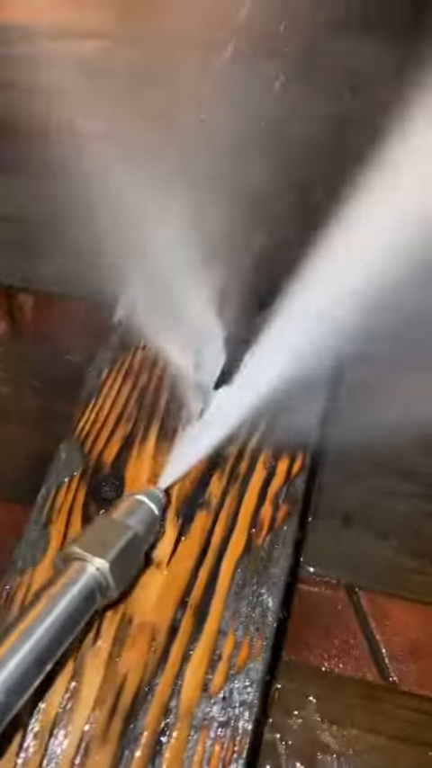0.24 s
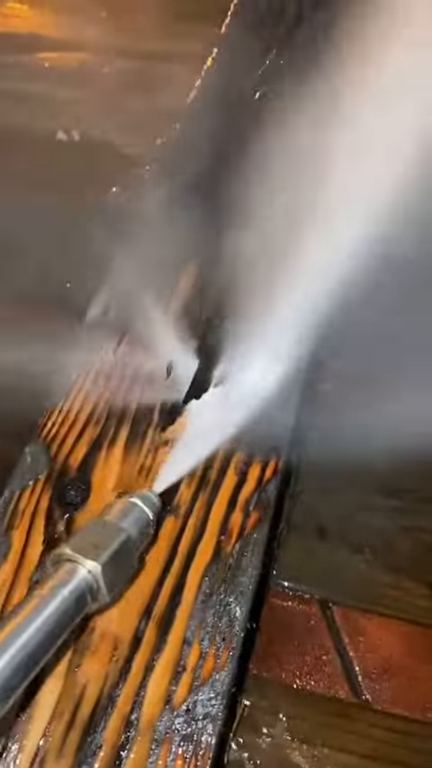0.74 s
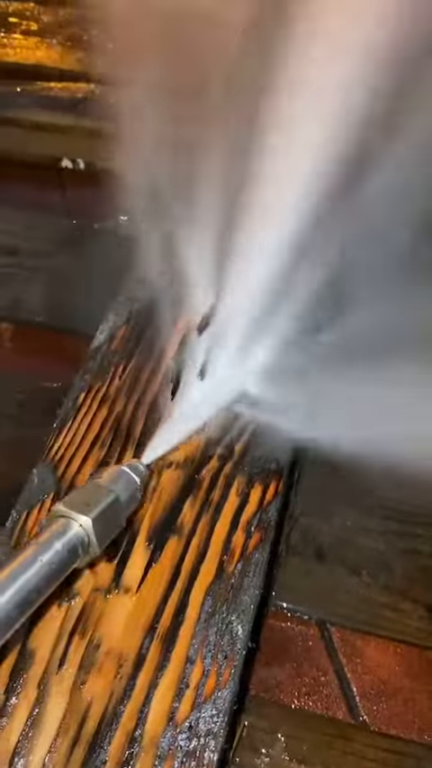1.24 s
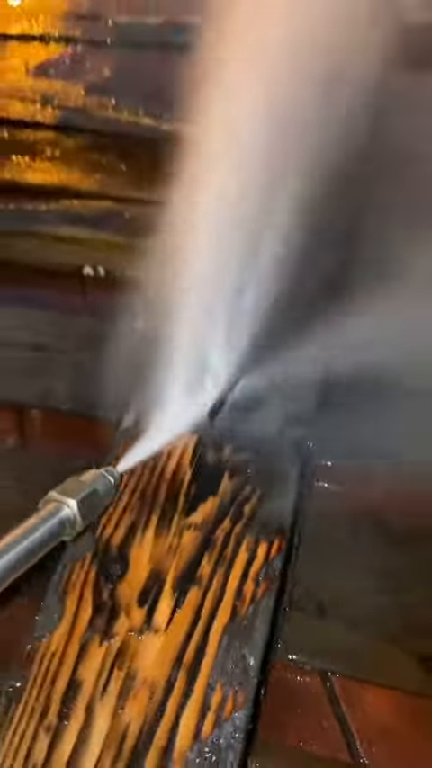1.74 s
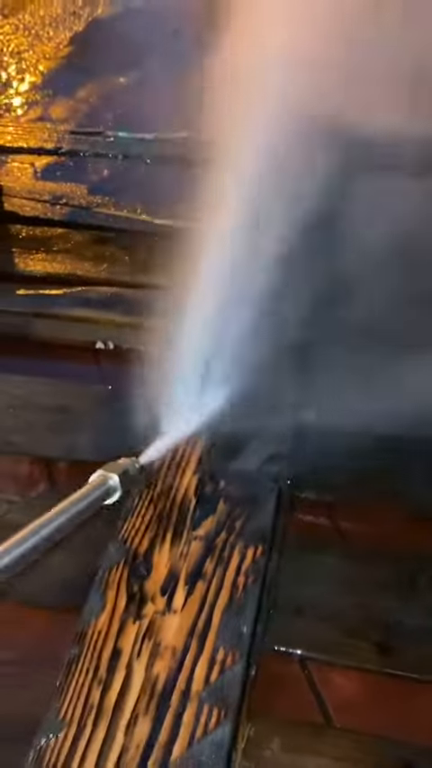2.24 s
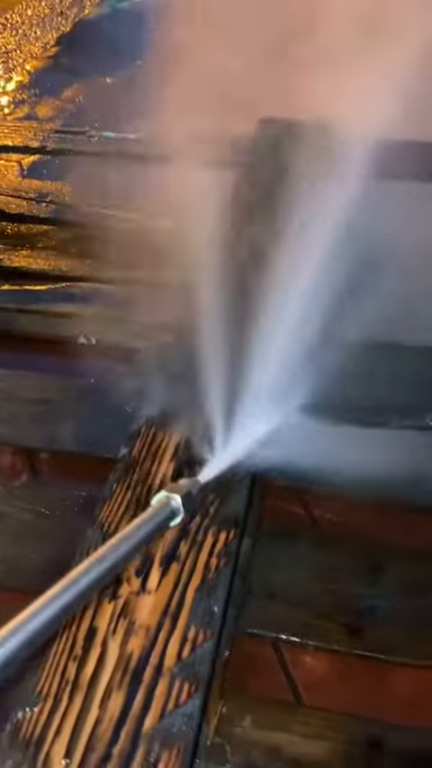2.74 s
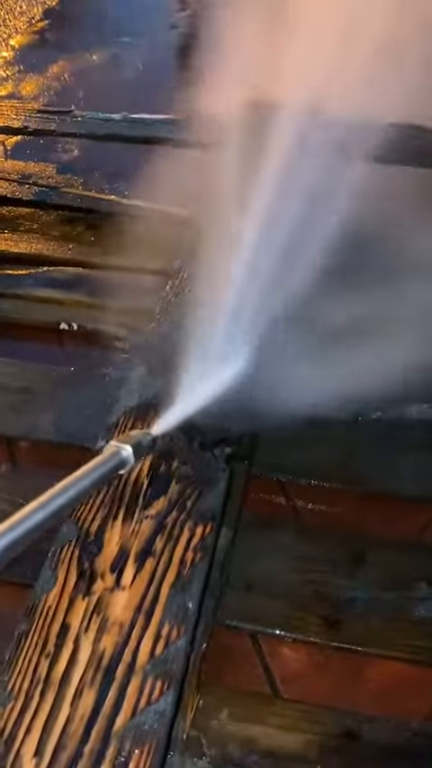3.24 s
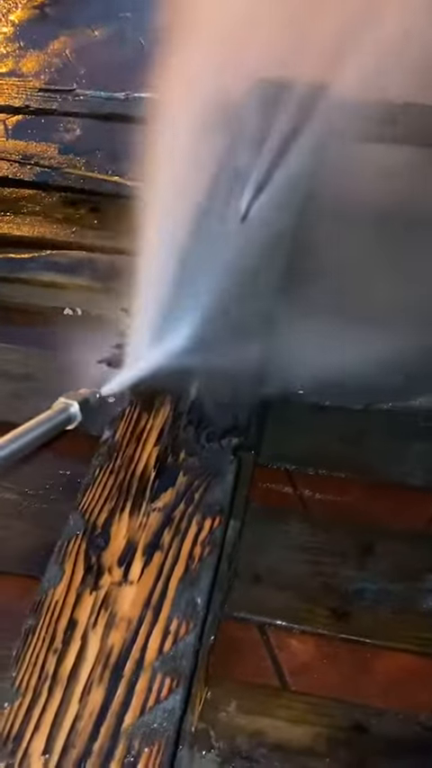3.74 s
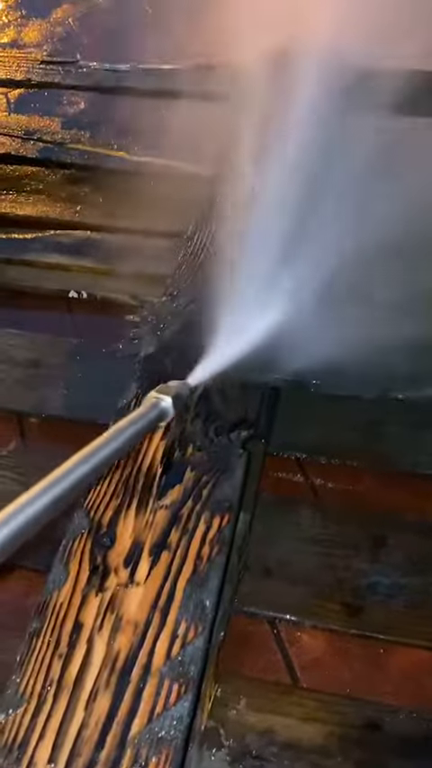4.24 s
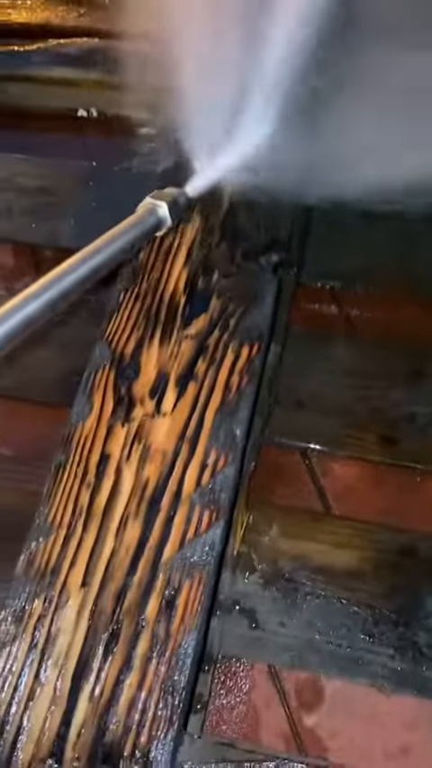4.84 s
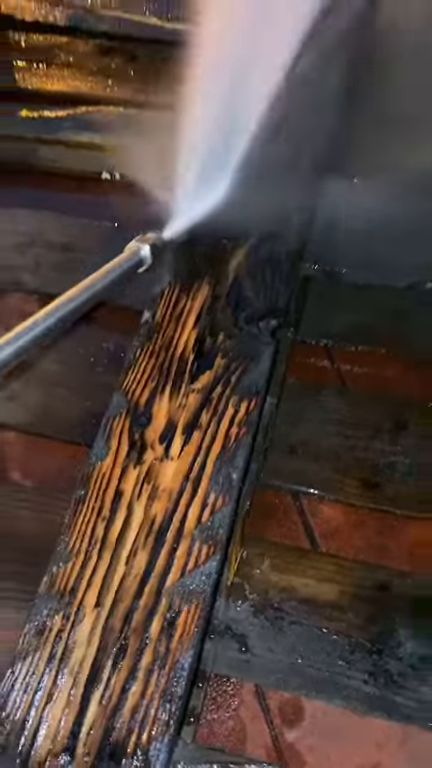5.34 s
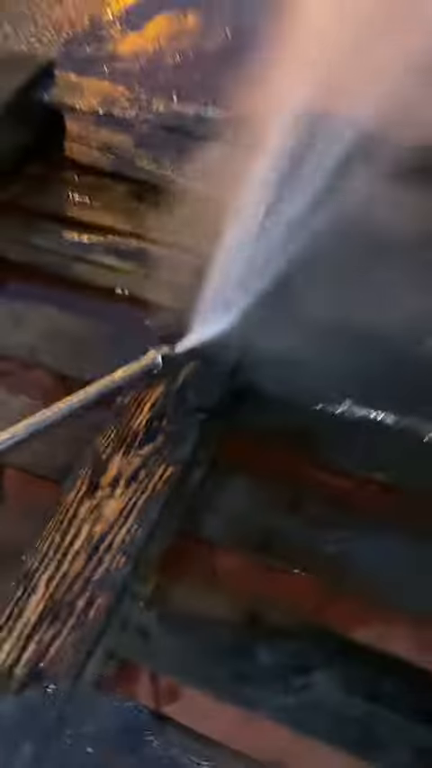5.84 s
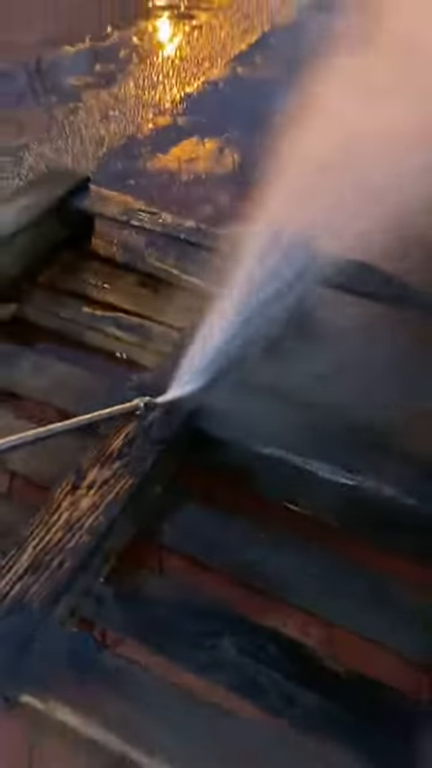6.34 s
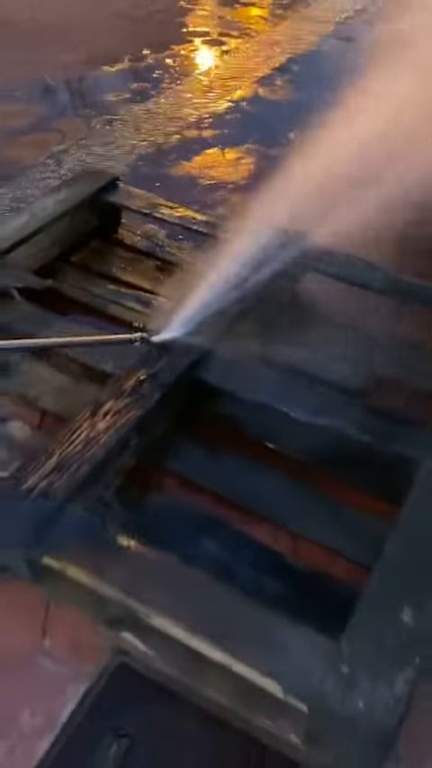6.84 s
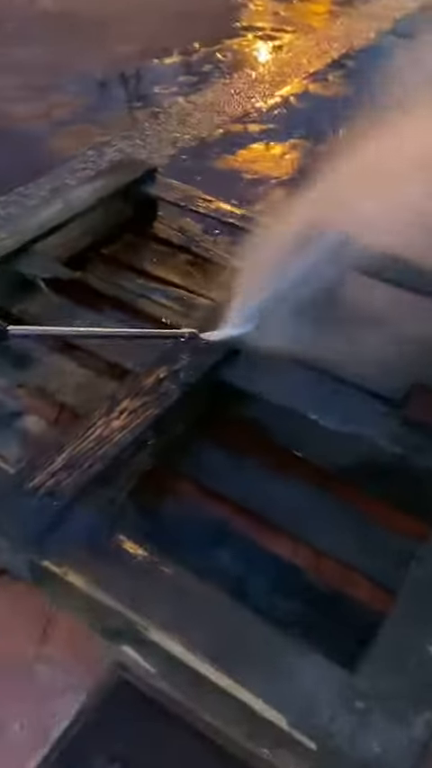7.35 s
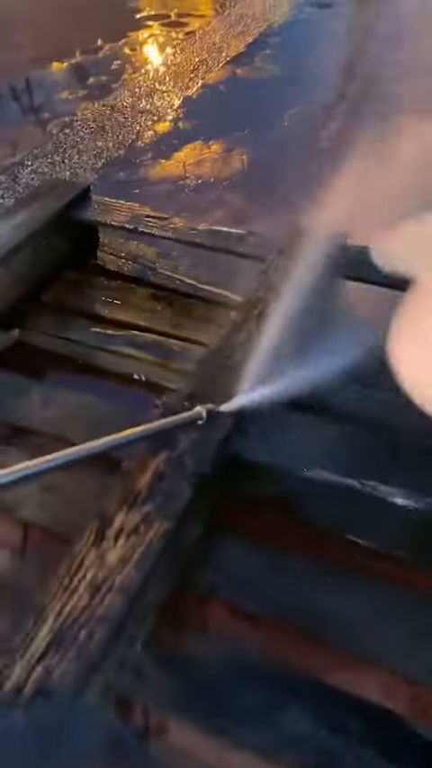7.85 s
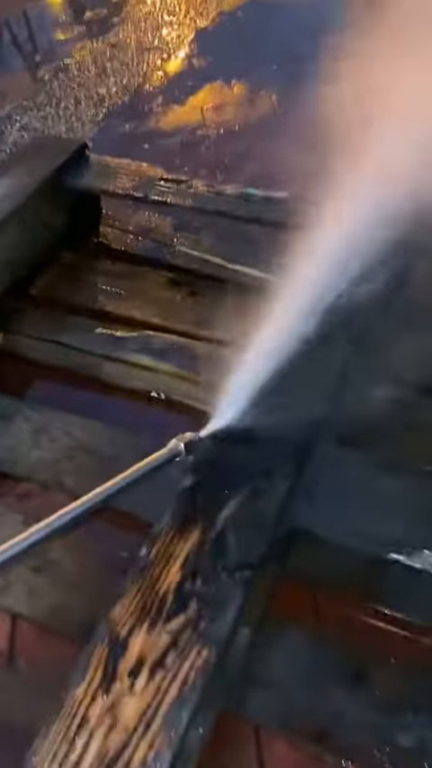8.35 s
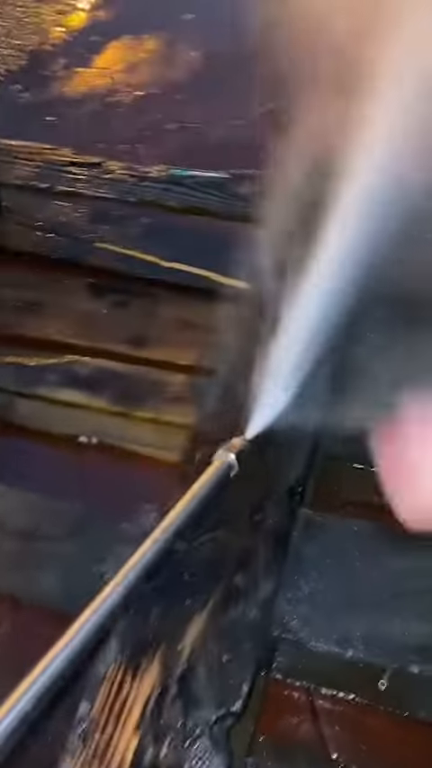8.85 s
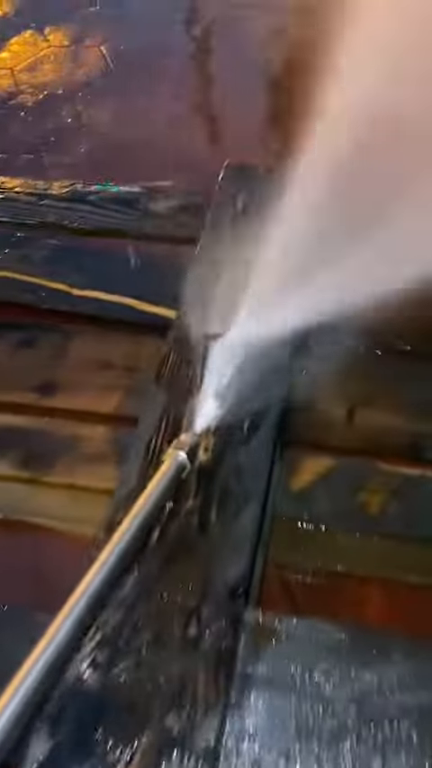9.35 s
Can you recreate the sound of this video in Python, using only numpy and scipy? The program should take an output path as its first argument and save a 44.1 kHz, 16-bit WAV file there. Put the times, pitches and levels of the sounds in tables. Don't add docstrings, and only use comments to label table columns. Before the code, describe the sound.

Close high-pressure water blasts timber with harsh steady hiss and hollow ringing gouges; a distant engine hums, and late puffs and droplets buffet the phone.

```python
import sys
import numpy as np
from scipy import signal
from scipy.fft import rfft, irfft, next_fast_len
from scipy.io import wavfile
from scipy.ndimage import uniform_filter1d

SR = 44100
rng = np.random.default_rng(int(sys.argv[2]) if len(sys.argv) > 2 else 0)


def to_linear_factor(level_db):
    exponent = np.asarray(level_db, float) / 20
    return 10 ** exponent


def wrap_up_sound(samples):
    columns = np.atleast_2d(samples).T
    tamed = np.clip(columns, -1, 1)
    steps = np.round(tamed * 32767).astype(np.int16)
    wavfile.write(sys.argv[1], SR, steps)


N = 422901
SIZE, HOP = 1024, 256
FRAME_RATE = SR / HOP
HZ = np.maximum(np.arange(SIZE // 2 + 1) * SR / SIZE, 1)[:, None]


def frames(x):
    return signal.stft(x, SR, nperseg=SIZE, noverlap=SIZE - HOP)[1:]


def unframe(z):
    return signal.istft(z, SR, nperseg=SIZE, noverlap=SIZE - HOP)[1][..., :N]


def over_time(table, t):
    s, *columns = np.transpose(table)
    return [np.interp(t, s, c) for c in columns]


def over_hz(table):
    hz, value = np.transpose(table)
    return np.interp(np.log(HZ), np.log(hz), value)


def walk(shape, hold):
    w = rng.standard_normal(shape)
    w = uniform_filter1d(uniform_filter1d(w, int(hold)), int(hold))
    return w / w.std()


def colour(table, lo_hz, hi_hz, lift_db=0):
    gain = to_linear_factor(over_hz(table) + lift_db)
    inside = (HZ > lo_hz) & (HZ < hi_hz)
    return gain / np.sqrt(np.sum(gain[inside] ** 2) / len(HZ))


def patches(count, swell_db, own_db):
    own = walk((28, count), hold=4.4)
    shared = uniform_filter1d(walk((28, count), hold=4.7), size=9, axis=0)
    field = own_db * own + swell_db * shared / shared.std()
    band = np.clip(np.log2(HZ[:, 0] / 40) * 3, 0, 26)
    low, part = band.astype(int), (band % 1)[:, None]
    return to_linear_factor(field[low] * (1 - part) + field[low + 1] * part)


# pitch in Hz, share of the power common to both.
ALIKE = [(60, 0.44), (300, 0.84), (700, 0.7), (1200, 0.5), (2300, 0.74), (5000, 0.58), (8500, 0.37),
         (9800, 0.08), (16000, 0.061)]


def ports(gain, lead, scatter, sputter_db, sputter_hz, edge=1):
    noise = rng.standard_normal((3, N)) * to_linear_factor(sputter_db * walk(N, SR / sputter_hz))
    near, left, right = frames(noise / noise.std())[1]
    turn = edge * np.exp(1j * np.pi * HZ * lead / SR)
    spread = np.where(HZ < 1800, np.minimum(scatter, .8), scatter)
    share = over_hz(ALIKE) ** np.where(HZ < 9400, spread, 1)
    near, far = near * np.sqrt(share), np.sqrt(1 - share)
    return unframe(gain * np.array([near * turn + far * left, near / turn + far * right]))


def bursts(t, start, length, db):
    start, length, db = (np.array(c)[:, None] for c in (start, length, db))
    attack_share, release_s, fade_db = 0.29, 0.054, 13.5
    early = np.maximum(1 - (t - start) / (attack_share * length), 0)
    late = np.maximum((t - start - length) / release_s, 0)
    return np.sum(to_linear_factor(db - fade_db * (early + late)) ** 2, axis=0)


# resonance in Hz, width in Hz, lift in dB.
PLANKS = [(592, 106, 6), (768, 113, 6), (1069, 205, 6.5), (1290, 33, 7.5), (1770, 90, -0.5), (2022, 154, 5),
          (2410, 300, 0.5), (3010, 76, 4), (3250, 112, 2), (4500, 350, 1.5), (5050, 980, -2.5)]


def planks():
    return sum(db / (1 + (2 * (HZ - hz) / width) ** 2) for hz, width, db in PLANKS)


# time in seconds, nozzle level at the phone in dB,
# glancing spray over it in dB, pressure into the wood over it in dB.
JET = [(0, -30, -3.5, -7.5), (.55, -30, -3, -10), (.75, -30, -2, -2.5), (1.25, -29, -6.5, -4),
       (1.5, -29.5, -3.5, -10), (1.95, -33, -1, -5), (2.35, -34, -2.5, -0.5), (2.8, -34.5, -2.5, 1.5),
       (3.7, -34, -11, -2), (4.3, -33, -4, -1.5), (4.8, -29, -2, -9.5), (5.4, -33, -3.5, -5),
       (5.95, -37.5, -4, -3.5), (7.2, -36.5, -1, -5), (7.75, -36, 0.5, 10), (7.87, -34.5, 1, 5),
       (7.96, -32.5, -0.5, -8.5), (8.95, -31, -8, -3), (9.59, -32, -5, -4)]
# start in seconds, length in seconds, roar in dB, bite over the roar in dB.
GOUGES = [(2.59, 0.17, -35.5, -0.5), (2.64, 0.54, -35, -22), (3.683, 0.098, -52.5, 19),
          (4.133, 0.48, -35, -19), (6.015, 0.097, -40, 0), (7.284, 0.57, -29.5, 0.5),
          (7.544, 0.36, -29.5, -8), (8.316, 0.17, -30, -2), (8.793, 0.018, -36.5, -8),
          (9.336, 0.013, -35, -11), (9.46, 0.044, -41, -8)]
# start in seconds, length in seconds, level in dB.
SHEETS = [
    (0.125, 0.15, -33.5),
    (.68, .06, -48),
    (0.855, 0.12, -28.5),
    (1.206, 0.19, -31.5),
    (2.65, 0.12, -33.5),
    (4.4, 0.21, -38.5),
    (4.73, 0.05, -32),
    (6.045, 0.15, -38.5),
    (7.386, 0.051, -36),
    (8.818, 0.052, -37),
]


def blast_powers(t):
    hiss_db, glance_db, press_db = over_time(JET, t)
    steady_db = hiss_db + np.array([0 * t, glance_db, press_db, press_db - 9])
    wander_db = np.array([.5, 1.0, 1.1, 1.5])[:, None] * walk((4, len(t)), FRAME_RATE / 20)
    hiss, splash, bite, roar = to_linear_factor(steady_db + wander_db) ** 2
    start, length, roar_db, over_db = np.transpose(GOUGES)
    splash = splash + bursts(t, *np.transpose(SHEETS))
    bite = bite + bursts(t, start, length, roar_db + over_db)
    roar = roar + bursts(t, start, length, roar_db)
    return hiss, splash, bite, roar


# pitch in Hz, level in dB per Hz.
HISS = [(3500, -22.5), (6500, -14.5), (7600, 0), (8300, 6.5), (9200, 0.5), (11400, 2.5), (14500, 1),
        (16500, -3)]
# pitch in Hz, level in dB per Hz.
SPLASH = [(2000, -13.5), (3400, -9), (4300, 1.5), (5500, 1), (7000, 1), (9500, -4.5)]
# pitch in Hz, level in dB per Hz.
BITE = [(700, -8), (1400, -4), (2400, -1), (3600, 1), (5200, -0.5), (8000, -19)]
# pitch in Hz, level in dB per Hz.
ROAR = [(200, -69), (400, -3), (520, -2), (1300, -6), (1700, -4), (3000, -23)]
# pitch in Hz, level in dB per Hz.
BOOM = [(350, -35), (580, -1.5), (850, -3.5), (1150, -2.5), (1500, -27), (2500, -40)]
# start in seconds, length in seconds, level in dB.
CAVITIES = [
    (2.75, 0.54, -43),
    (7.448, 0.4, -29.5),
    (8.321, 0.17, -28.5),
]
# time in seconds, samples by which the left port hears it first,
# scatter (1 usual, less = one clear spot), pitch in Hz at which the phone's edge turns one port
# against the other, width of that turn in Hz.
SIDEWAYS = [(0, 1.52, 0.82, 6320, 1200), (1.5, 1.75, 0.57, 6370, 1200), (1.9, 1.33, .8, 6100, 500),
            (2.7, 1.2, 0.69, 5600, 500), (2.9, 2.2, 1, 6450, 900), (3.6, 2, 1.1, 6960, 1090),
            (3.82, 2.55, 0.39, 7400, 1190), (4.2, 2.6, 0.67, 6800, 1500), (4.38, 1.5, 1.1, 5000, 2000),
            (4.5, 1, 0.8, 3660, 2280), (4.77, 2.5, 0.45, 3530, 2270), (4.81, 2.5, .08, 3570, 2270),
            (4.95, 1.5, .08, 3550, 2280), (5, 1.9, 0.76, 3600, 2250), (5.12, 1.5, 0.35, 3670, 2260),
            (5.2, 1.9, .4, 3630, 2260), (5.26, 1.9, 0.87, 3740, 2250), (5.34, 1.6, 1, 4500, 2100),
            (5.38, 1.36, 0.17, 4870, 2020), (5.46, 1.36, .15, 4950, 2020), (5.5, 1.7, 0.51, 5300, 1900),
            (5.54, 2.2, .15, 5670, 1810), (5.65, 1.6, .15, 5650, 1795), (5.7, 1.5, .7, 5860, 1396),
            (5.8, 2, 0.37, 5930, 876), (6.3, 1.15, 0.39, 5860, 392), (7.05, 2.05, 0.72, 7080, 790),
            (7.5, 1.24, 0.64, 5920, 500), (8.8, 1.96, 1, 5980, 500), (9.59, 2.1, 1.4, 6500, 601)]


def jet(t):
    hiss, splash, bite, roar = blast_powers(t)
    ring_db = planks()
    lead, scatter, edge_hz, width_hz = over_time(SIDEWAYS, t)
    leftward = SR / 2 / edge_hz - SR / 2 / 5840
    shade_db = -3.5 * leftward * np.clip((HZ - 9300) / (14000 - 9300), 0, 1)
    power = colour(HISS, 9730, 12760) ** 2 * hiss * to_linear_factor(shade_db) ** 2
    power = power + colour(SPLASH, 3960, 7130) ** 2 * splash
    power = power + colour(BITE, 980, 7400, ring_db) ** 2 * bite
    power = power + colour(ROAR, 500, 2130, ring_db) ** 2 * roar
    power = power + colour(BOOM, 500, 1400, ring_db) ** 2 * bursts(t, *np.transpose(CAVITIES))
    gain = np.sqrt(power) * patches(len(t), swell_db=.3, own_db=.8)
    pan_db = 1.1 + 0.44 * leftward
    edge = to_linear_factor(pan_db / 2) * np.exp(1j * np.arctan2(width_hz * HZ, edge_hz ** 2 - HZ ** 2))
    tremble = .3 * np.clip(2 * scatter, 0, 1) * walk(len(t), FRAME_RATE / 15)
    return ports(gain, lead + tremble, scatter, sputter_db=0.21, sputter_hz=340, edge=edge)


# time in seconds, level in dB, cycle rate in Hz,
# exhaust facing the phone in dB.
YARD = [(0, -49, 28.05, -30), (1.2, -48.5, 27.69, -20), (2.7, -46.5, 27.9, -14), (3.1, -43, 28.12, -10.5),
        (3.7, -45, 27.37, -21), (4.4, -43, 27.14, -5), (4.9, -46, 27.55, -2), (5.1, -54.5, 27.22, -12),
        (5.6, -49, 27.45, -7), (5.75, -48, 27.3, -1), (7.1, -50, 27.72, 5.5), (7.6, -46.5, 27.43, 2),
        (8, -44.5, 27, -2), (8.5, -44, 26.84, -1.5), (9.59, -55, 27.44, -4)]
ORDER_DB = [-8, 13.5, 0.5, -8, 1, -26, -8, -8, -7.5, -12, -35, -11.5]


def engine(t):
    drone_db, cycle_hz, exhaust_db = over_time(YARD, np.arange(N) / SR)
    phase = 2 * np.pi * np.cumsum(cycle_hz * (1 + .0015 * walk(N, SR / 2))) / SR
    start = rng.uniform(0, 2 * np.pi, len(ORDER_DB))
    waver_db = np.repeat(0.41 * walk((len(ORDER_DB), len(t)), FRAME_RATE / 5), HOP, axis=1)[:, :N]
    waver_db = uniform_filter1d(waver_db, HOP)
    waver_db[1] += exhaust_db
    drone = sum(to_linear_factor(db + waver_db[k]) * np.sin((k + 1) * phase + start[k]) for k, db in enumerate(ORDER_DB))
    return to_linear_factor(drone_db) * drone, phase


# pitch in Hz, level in dB per Hz.
RUMBLE = [(20, -24), (35, -30), (55, -18), (80, 1.5), (150, -2), (300, -4), (500, -6), (900, -13.5)]
# pitch in Hz, level in dB per Hz.
SHUDDER = [(45, -20), (75, 2), (120, 1), (250, -39)]
# start in seconds, length in seconds, level in dB.
SHUDDERS = [
    (4.2, .35, -39),
    (4.6, .33, -42),
    (7.8, .2, -52),
]


def yard(t):
    drone, phase = engine(t)
    rumble_db = over_time(YARD, t)[0] + 0.93
    rumble = colour(RUMBLE, 40, 400) * to_linear_factor(rumble_db) * patches(len(t), swell_db=-0.5, own_db=3.0)
    shudder = colour(SHUDDER, 40, 200) * np.sqrt(bursts(t, *np.transpose(SHUDDERS)))
    low = ports(np.hypot(rumble, shudder), 0.53, 0.9, sputter_db=0.0, sputter_hz=60)
    return low * (1 + 0.071 * np.cos(phase)) + drone


# time in seconds, peak in dB, rise in ms.
PUFFS = [
    (4.685, -20, 0.49),
    (8.145, -14, 0.79),
    (8.173, -19, 0.44),
    (8.18, -15, 0.88),
    (8.217, -11, 0.69),
    (8.24, -11, 1),
    (8.266, -6.5, 1),
    (8.296, -8.5, 1),
    (8.324, -21, 0.47),
    (8.359, -15, 0.97),
]
# time in seconds, peak in dB, rise in ms.
FLICKS = [(8.806, -19.5, 0.54), (8.816, -16.5, 0.23), (8.826, -30, .5), (8.871, -27, 0.29),
          (8.929, -23, 0.34), (8.947, -23, 0.18), (8.955, -22, 0.23), (8.993, -22, 0.21), (9.004, -24, .25),
          (9.019, -28, .3), (9.041, -17.5, 0.3), (9.058, -21, 0.25), (9.096, -15.5, 0.25),
          (9.112, -16, 0.3), (9.127, -22, 0.18), (9.162, -16.5, 0.11), (9.185, -26, .25), (9.2, -18, 0.17),
          (9.231, -26, .1), (9.284, -41, 0.17), (9.309, -31, 0.22), (9.334, -24.5, 0.19),
          (9.347, -16, 0.12), (9.359, -31, 0.15), (9.42, -27, 0.13), (9.459, -25, .08), (9.48, -26, .2),
          (9.498, -19, 0.07), (9.526, -32, .15)]


def puffs(table, gain_db, rough):
    length = 2048
    out, ms = np.zeros((2, N + length)), np.arange(length) / SR * 1000
    for t, db, rise_ms in table:
        u = ms / max(rise_ms, .05)
        push = to_linear_factor(db + gain_db) * (u / 2) ** 2 * np.exp(2 - u)
        push = push * (1 + rough * walk(length, SR / 1200))
        balance = 1 + rng.choice([-.1, .1]) * np.array([[1], [-1]])
        first = int(t * SR)
        out[:, first:first + length] += push * balance
    return out[:, :N]


def scene():
    t = frames(np.zeros(N))[0]
    mist = puffs(PUFFS, gain_db=5.5, rough=0.089) + puffs(FLICKS, gain_db=3.5, rough=0.1)
    return jet(t) + yard(t) + mist


def smear(x, cycles, turn):
    size = next_fast_len(N + SR)
    hz = np.maximum(np.arange(size // 2 + 1) * SR / size, 25)
    delay = np.exp(2j * np.pi * (cycles * np.log(SR / 2 / hz) + turn))
    bass_block = hz ** 2 / (hz ** 2 + 50 ** 2)
    return irfft(rfft(x, size) * delay * bass_block, size)[:, :N]


# pitch in Hz, share of the other port taken off.
STEER = [(300, 0.21), (2200, 0.11), (4400, 0.0069), (5700, 0.029), (6600, 0.14), (7400, 0.47), (8100, 0.46),
         (9400, 0.52), (10300, 1), (16000, 0.83)]
# pitch in Hz, extra cycles of delay between the ports.
STEER_BEND = [(4400, -0.045), (6000, 0.32), (7300, 0.16), (9600, 0.067), (12250, -0.016), (14300, -0.036)]
# time in seconds, grip (1 usual).
GRIP = [(0, 0.85), (.95, 0.66), (1.1, 1.06), (1.7, 1.2), (1.9, .7), (2.7, 0.43), (2.8, 1.7), (4.33, 1.44),
        (4.42, 0.75), (4.55, 1.1), (4.6, 2.3), (5.2, 2.1), (5.25, 1.3), (5.55, 1.05), (5.62, 1.7),
        (5.95, 1.13), (6.4, 0.67), (6.6, 1.04), (7.4, 1.1), (7.6, 1)]


def steering(t):
    hunt = .04 * walk(len(t), FRAME_RATE / 9) * (HZ > 5000)
    drift = .025 * walk(len(t), FRAME_RATE / 2) * (HZ > 5500) * (HZ < 9000)
    grip = np.where((HZ > 7000) & (HZ < 9600), over_time(GRIP, t)[0], 1)
    port_gap_s = 10 / 44100
    cycles = HZ * port_gap_s + over_hz(STEER_BEND) + hunt + drift
    return np.clip(over_hz(STEER) * grip, 0, .95) * np.exp(-2j * np.pi * cycles)


# full from and until in seconds, depth from 0 to 1, bass cut in Hz, release in seconds.
GUSTS = [(0, 0.62, 0.98, 760, 0.12), (.65, 1.166, 0.17, 40, 0.16), (0.837, 0.888, 0.3, 140, .025),
         (1.16, 2.29, 0.51, 332, 0.19), (1.253, 2.08, 0.65, 630, 0.18), (1.357, 1.802, 1, 694, 0.56),
         (1.516, 1.682, 0.95, 810, .4), (2.3, 2.432, 0.29, 200, .15), (2.4, 2.62, 0.13, 120, 0.55),
         (8.857, 9.053, 0.08, 102, 0.044), (9.063, 9.163, 0.29, 120, 0.073), (9.186, 9.26, 0.5, 340, 0.023),
         (9.278, 9.38, 0.46, 120, 0.029), (9.39, 9.603, 0.35, 350, 0.034)]


def wind_guard(t):
    start, end, depth, cut_hz, release = np.transpose(GUSTS)[:, :, None]
    rest_hz, attack_share, fall_oct_s = 22, 0.43, 0.63
    rising, falling = 1 + (t - start) / (attack_share * release), 1 - (t - end) / release
    on = np.clip(np.minimum(rising, falling), 0, 1)
    octaves = np.max(on * np.log2(cut_hz / rest_hz), axis=0)
    held = np.maximum.accumulate(octaves + fall_oct_s * t) - fall_oct_s * t
    return np.max(on * depth, axis=0), rest_hz * 2 ** octaves, rest_hz * 2 ** held


def tiles(z, size):
    power = uniform_filter1d(uniform_filter1d(abs(z) ** 2, size, axis=0), size=4, axis=1)
    rows = np.arange(z.shape[0]) // size * size + size // 2
    columns = np.arange(z.shape[1]) // 4 * 4 + 2
    power = power[np.minimum(rows, z.shape[0] - 1)][:, np.minimum(columns, z.shape[1] - 1)]
    return 10 * np.log10(np.maximum(power, 1e-20))


# pitch in Hz, dB over its partner at which a tile is left out.
SPARE = [(500, -30), (2000, -11), (5000, -8), (6300, -6), (7500, -5.5), (9200, -7), (10200, -3),
         (14200, -.5), (15000, -4.5)]
# pitch in Hz, dB over its neighbours at which a speck is left out.
FAINT = [(700, -30), (1100, -14), (1500, -8.5), (2500, -6.3), (5000, -4.2), (8000, -3.2), (16000, -3.8)]
# pitch in Hz, how far strong cells are favoured.
SPARSE = [(500, 0.007), (2000, 0), (8000, 0.44), (16000, 0)]


def thrift(z, partner, watery):
    level_db, speck_db = tiles(z, size=6), tiles(z, size=2)
    rows, columns = z.shape
    patchy = rng.standard_normal((rows // 6 + 1, columns // 8 + 1))
    patchy = np.kron(patchy, np.ones((6, 8)))[:rows, :columns]
    masked = level_db < tiles(partner, size=6) + over_hz(SPARE) + 2.8 * patchy
    faint = speck_db < tiles(z, size=24) + over_hz(FAINT) + 8 * watery
    quiet, high = speck_db < -81.5, HZ > 15700
    favour = np.clip(over_hz(SPARSE) + watery, 0, 1)
    z = z * np.minimum(abs(z) / to_linear_factor(level_db), 4) ** favour
    return z * ~(masked | faint | quiet | high)


def band_limit(x):
    return signal.sosfilt(signal.butter(12, 16940, fs=SR, output="sos"), x)


# pitch in Hz, gain in dB at full depth.
DUCK = [(30, -65), (150, -83), (500, -22), (750, -22.5), (1000, -18.5), (2000, -2.5), (3900, -2.5),
        (4100, 0)]
# time in seconds, left over right in dB.
TILT = [(0, -0.1), (2.2, -2), (3.2, 0), (4.2, 0), (5.6, 1.3), (6.2, -1), (7.7, -1.5), (9.59, 0.4)]
# time in seconds, edge in Hz.
SHELF = [(0, 3910), (2.22, 3980), (2.4, 2700), (2.61, 1940), (2.65, 100)]


def record(dry):
    t, (left, right) = frames(smear(dry, cycles=1.28, turn=.1))
    cross = steering(t)
    depth, cut_hz, mono_hz = wind_guard(t)
    guard = to_linear_factor(depth * over_hz(DUCK)) / (1 + (cut_hz / HZ) ** 12) / np.sqrt(1 + abs(cross) ** 2)
    mid = (left + right) / 2 * (1 - cross) * guard
    side = (left - right) / 2 * (1 + cross) * guard / (1 + (mono_hz / HZ) ** 12)
    watery = .4 * depth * (HZ < 4000)
    mid, side = thrift(mid, side, watery), thrift(side, mid, watery)
    tilt = to_linear_factor(over_time(TILT, t)[0] / 2)
    shelf = to_linear_factor(-7 * (HZ < over_time(SHELF, t)[0]))
    mix = unframe(shelf * np.array([(mid + side) * tilt, (mid - side) / tilt]))
    return band_limit(mix)


dry = scene()
out = record(dry)
wrap_up_sound(out)
```